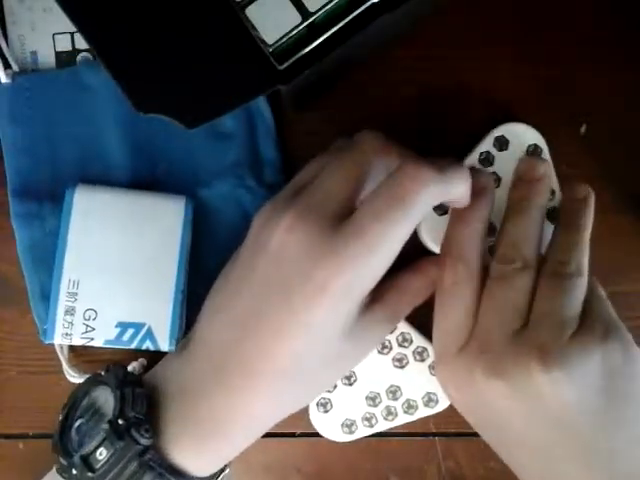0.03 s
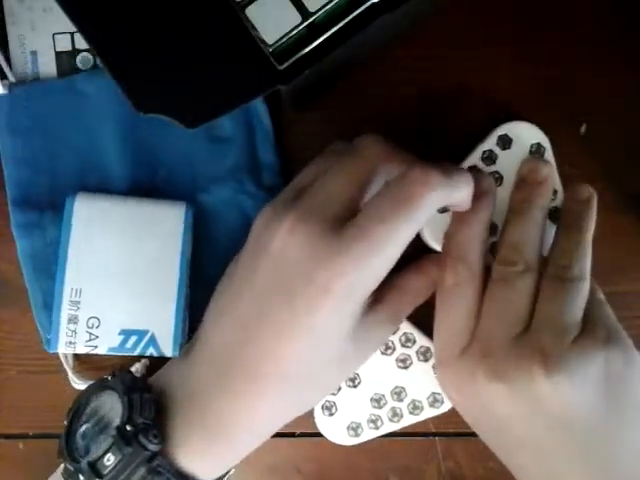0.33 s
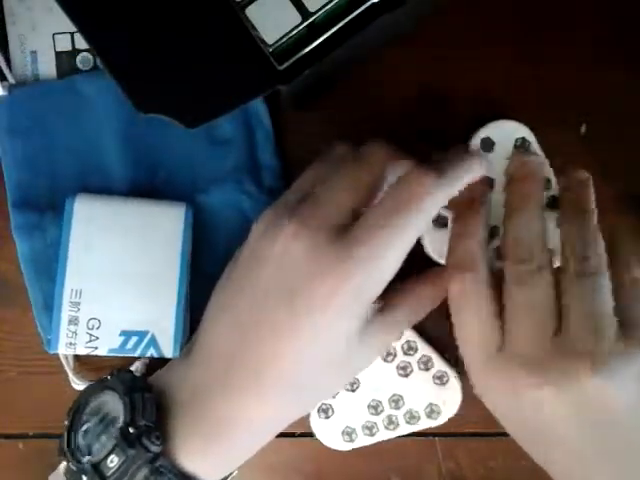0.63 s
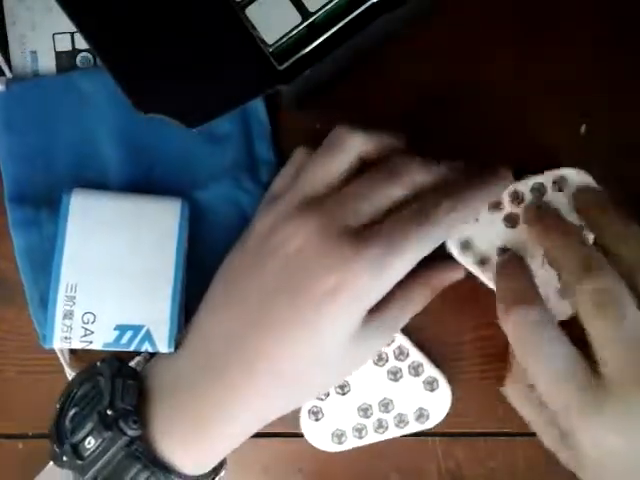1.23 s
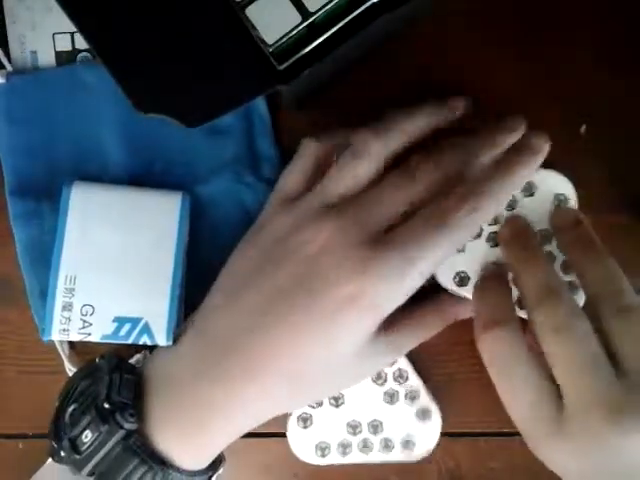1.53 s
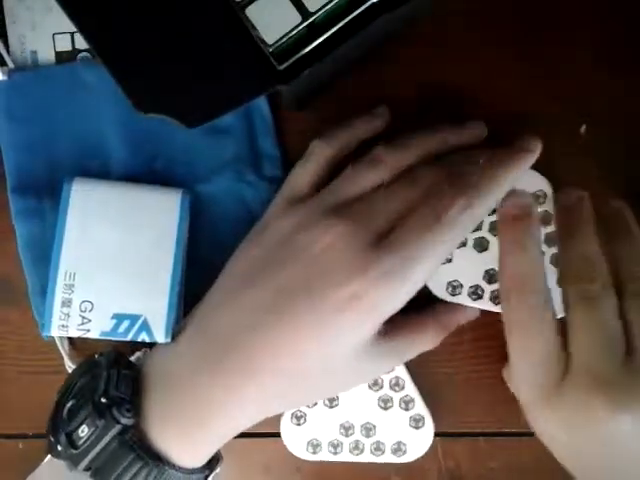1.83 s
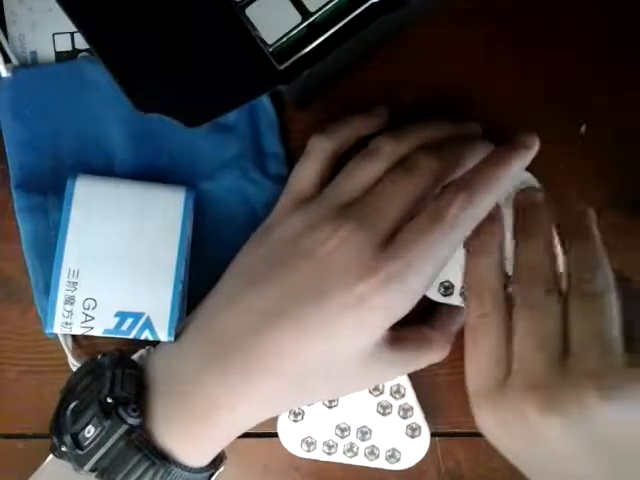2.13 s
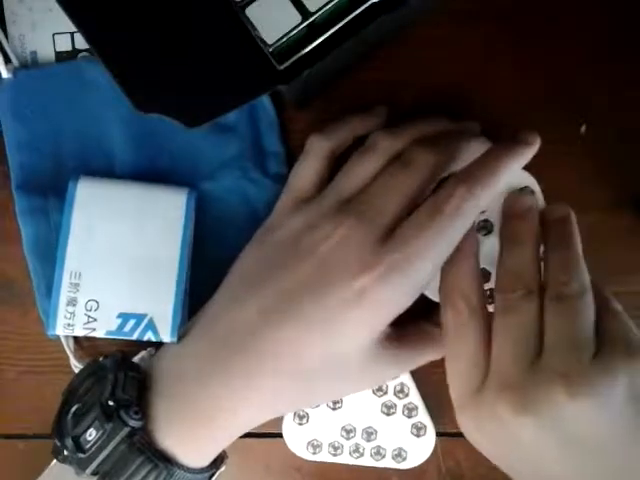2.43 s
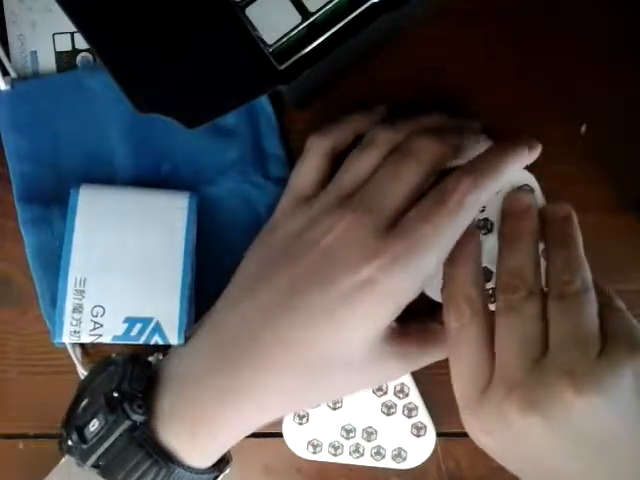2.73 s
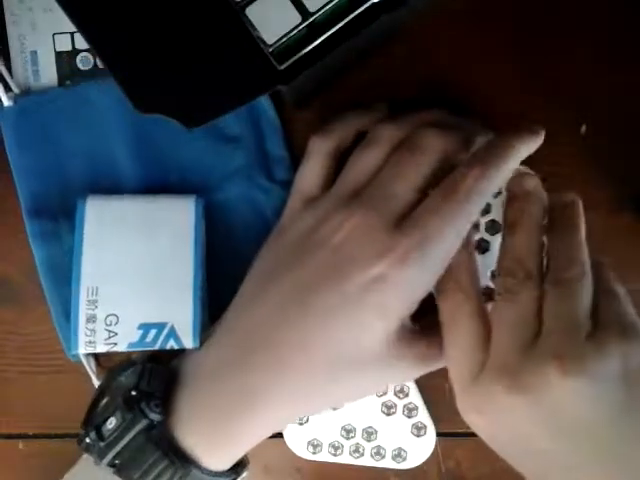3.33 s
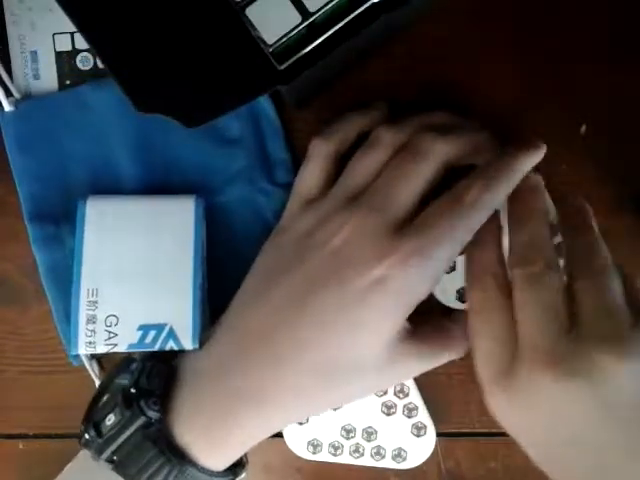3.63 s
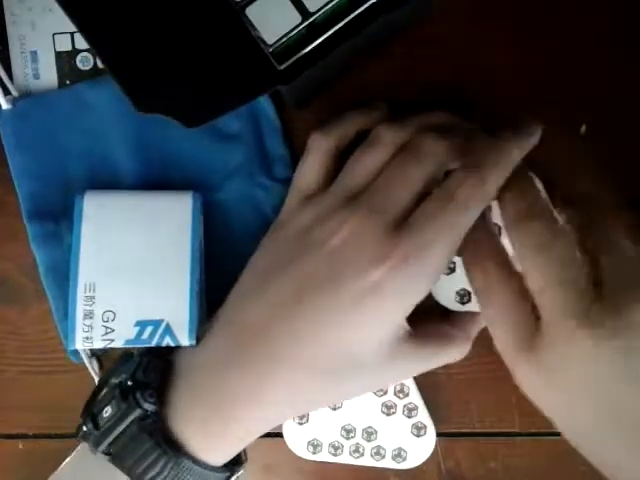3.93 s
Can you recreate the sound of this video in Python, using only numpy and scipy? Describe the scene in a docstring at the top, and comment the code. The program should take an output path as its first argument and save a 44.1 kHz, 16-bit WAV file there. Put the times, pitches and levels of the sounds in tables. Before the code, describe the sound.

Small stiff cards are handled on a wooden table in a small room. Light ticks lead to a flat slap at about 0.8 seconds, then papery sliding and scraping with tiny squeaks until 1.7. Scattered taps, soft knocks and a brief slide follow. At 3.5 seconds one card snaps down hard with a thump, the loudest moment, then a few quieter ticks. A faint low electrical hum runs underneath.

```python
"""A small room: hands turn and slide small stiff cards on a wooden table.
Edges tick and scrape as bursts of micro-impacts that drive the papery card and the ringing tabletop.
Sliding cards hiss, rasp and squeak, flat slaps knock hollow, and hands thump softly on the wood.
Near the end one card snaps down hard; a limiter catches it and slow gain control ducks what follows.
A low electrical hum lies under it all."""
import sys
import numpy as np
from scipy import signal
from scipy.fft import rfft, irfft
from scipy.io import wavfile
from scipy.ndimage import uniform_filter1d

SR = 44100
rng = np.random.default_rng(int(sys.argv[2]) if len(sys.argv) > 2 else 0)


def output_pcm(signal):
    """Save a mono or channel-first signal as 16-bit PCM at the path in sys.argv[1].

    Samples are clipped to [-1, 1] before scaling.
    """
    pcm = np.clip(np.atleast_2d(signal).T, -1, 1) * 32767
    wavfile.write(sys.argv[1], SR, np.round(pcm).astype(np.int16))


N = 176400

# card response: (frequency [Hz], relative level [dB])
CARD_SPECTRUM = [(900, -26), (1500, -16), (2240, -13.5), (2600, -5.5), (3380, 0.5), (3950, -1.5),
                 (4600, -1), (5340, 1.5), (6130, -2), (7200, -16.5), (8100, -19), (9200, -26.5),
                 (12000, -36), (15500, -48)]
# tabletop response: (frequency [Hz], relative level [dB])
WOOD_SPECTRUM = [(120, -7), (290, -17), (410, 1), (465, -3), (522, 8.5), (595, -13.5), (662, 5.5),
                 (740, -3.5), (840, 1.5), (1000, -6.5), (1330, -2), (1620, -13), (1900, -7), (2600, -20),
                 (5000, -43)]
ATTACK_S = 0.00064


def amp(db):
    """Decibels to gain."""
    return 10 ** (np.asarray(db) / 20)


def unit(x):
    """Scale to unit rms."""
    return x / np.sqrt(np.mean(x ** 2) + 1e-20)


def log_interp(points, hz):
    """Table lookup on a log-frequency axis."""
    f, value = np.transpose(points)
    return np.interp(np.log(hz + 1), np.log(f + 1), value)


def add(mix, start_s, sound):
    """Mix a sound in, in place."""
    part = mix[round(start_s * SR):][:len(sound)]
    part += sound[:len(part)]


def body(spectrum, tilt_db_per_oct=0, pivot_hz=4500):
    """Minimum-phase impulse response of unit energy, tilted around the pivot."""
    hz = np.fft.rfftfreq(4096, 1 / SR)
    octaves = np.clip(np.log2((hz + 1) / pivot_hz), -.7, .6)
    db = log_interp(spectrum, hz) + tilt_db_per_oct * octaves
    mirrored_db = np.r_[db, db[-2:0:-1]]
    phase = -signal.hilbert(np.log(amp(mirrored_db))).imag[:len(hz)]
    response = irfft(amp(db) * np.exp(1j * phase))
    return response / np.linalg.norm(response)


def background(noise_db=-49.5, hum_hz=122.3, hum_db=-52.5):
    """Low rumble, faint hiss and steady electrical hum."""
    # room noise: (frequency [Hz], relative level [dB])
    noise_spectrum = [(20, -20), (40, -13.5), (56, 1), (72, -5.5), (95, 3.5), (125, 1.5), (165, -5),
                      (210, -12.5), (280, -20), (500, -22), (1000, -26.5), (2000, -30.5), (5000, -28.5),
                      (8000, -33.5), (15500, -35.5)]
    gain = amp(log_interp(noise_spectrum, np.fft.rfftfreq(N, 1 / SR)))
    noise = irfft(rfft(rng.standard_normal(N)) * gain, N)
    hum = np.sin(2 * np.pi * hum_hz * np.arange(N) / SR)
    return amp(noise_db) * unit(noise) + amp(hum_db) * unit(hum)


def room(x, wet_db=-6.5, early_db=6.5, early_s=0.021, build_s=0.0068, size=22050):
    """Dense reflections, strong early from nearby surfaces; each band decays at its own rate."""
    # reverberation: (frequency [Hz], T60 [s])
    decay_times = [(150, 0.61), (600, 0.26), (3500, 0.33), (6000, 0.25), (10000, 0.28), (16000, 0.26)]
    reflections = rng.standard_normal(size) * (rng.random(size) < .15)
    hz, t, bands = signal.stft(reflections, SR, nperseg=256)
    level_db = early_db * np.exp(-(t / early_s) ** 2) - 60 * t / log_interp(decay_times, hz)[:, None]
    tail = signal.istft(bands * amp(level_db), SR, nperseg=256)[1]
    tail *= np.clip(np.arange(len(tail)) / SR / build_s, 0, 1) ** 2
    return amp(wet_db) * signal.fftconvolve(x, tail / np.linalg.norm(tail))[:N]


def thumps(rise_s=0.0064, decay_s=0.03, size=12000):
    """Fingers and the heel of the hand press down; the table booms briefly."""
    # hand pushes: (time [s], level [dB])
    pushes = [(0.23, -50), (0.345, -46), (.405, -46.5), (.597, -47.5), (1.69, -47.5), (2.324, -41),
              (2.55, -39.5), (3.346, -34), (3.515, -22.5)]
    # table boom: (frequency [Hz], relative level [dB])
    boom_spectrum = [(30, -26), (60, -15), (90, -2), (125, 6.5), (185, -5), (260, -17), (1000, -40)]
    out, t, table = np.zeros(N), np.arange(size) / SR, body(boom_spectrum)
    envelope = (1 - np.exp(-t / rise_s)) * np.exp(-t / decay_s)
    for start_s, db in pushes:
        boom = signal.fftconvolve(rng.standard_normal(size) * envelope, table)
        add(out, start_s, amp(db) * boom * np.sqrt(decay_s * SR / np.sum(boom ** 2)))
    return out


def squeaks(length_s=0.03, filter_width_hz=770):
    """Stick-slip: short swells of friction in one narrow resonance."""
    # card slips: (time [s], pitch [Hz], level [dB])
    slips = [(0.926, 4800, -33), (0.476, 2980, -52), (1.698, 3180, -34), (2.334, 2720, -45),
             (2.468, 2680, -38.5), (2.696, 3220, -47), (3.345, 3250, -30)]
    out, swell = np.zeros(N), np.hanning(int(length_s * SR))
    for start_s, hz, db in slips:
        resonance = signal.iirpeak(hz, hz / filter_width_hz, SR)
        friction = signal.filtfilt(*resonance, rng.standard_normal(SR))[SR // 2:][:len(swell)]
        add(out, start_s, amp(db) * swell * unit(friction))
    return out


def grit(unevenness, size):
    """Micro-impacts of uneven strength."""
    impacts, strength = rng.standard_normal((2, size))
    return unit(impacts * np.exp(unevenness * unit(uniform_filter1d(strength, size=12))))


def shifting_grip(x, depth_db=2):
    """Resonances come and go at random as the card turns and the grip changes."""
    bands = signal.stft(x, nperseg=512)[2]
    patches = uniform_filter1d(rng.standard_normal(bands.shape), size=5, axis=0)
    patches = uniform_filter1d(patches, size=12, axis=1)
    return unit(signal.istft(bands * amp(depth_db * unit(patches)), nperseg=512)[1][:N])


def slides(flutter_db=2, catches_per_s=60, unevenness=0.13):
    """Friction drives card and tabletop; the face rasps, the edge catches on the grain and rings."""
    # one breakpoint list per stroke: (time [s], hiss level [dB], tabletop level [dB])
    strokes = [
        [(.78, -31.5, -39), (.86, -33.5, -53.5), (.96, -43.5, -51), (1.06, -40.5, -52.5), (1.095, -45, -44),
         (1.19, -45, -52), (1.23, -37, -50.5), (1.29, -38.5, -48), (1.34, -31.5, -47.5), (1.38, -38.5, -72),
         (1.415, -28, -41.5), (1.48, -48, -54.5), (1.54, -41, -51.5), (1.63, -31.5, -45.5),
         (1.715, -46.5, -53.5), (1.78, -73, -60.5)],
        [(2.3, -55, -50.5), (2.38, -57, -59), (2.465, -34.5, -44), (2.505, -49, -47), (2.61, -50, -58.5),
         (2.72, -55, -59)],
    ]
    edge_hz, edge_width_hz, face_hz, face_width_hz = 7580, 430, 1790, 1250
    hiss_trim_db, catch_re_hiss_db, rasp_re_hiss_db = -3, -10, -15.5
    edge = signal.iirpeak(edge_hz, edge_hz / edge_width_hz, SR)
    face = signal.iirpeak(face_hz, face_hz / face_width_hz, SR)
    out, t = np.zeros(N), np.arange(N) / SR
    for stroke in strokes:
        times_s, hiss_db, wood_db = np.transpose(stroke)
        moving = (t > times_s[0]) * (t < times_s[-1])
        hiss_gain = amp(np.interp(t, times_s, hiss_db) + hiss_trim_db) * moving
        wood_gain = amp(np.interp(t, times_s, wood_db)) * moving
        flutter = amp(flutter_db * unit(uniform_filter1d(rng.standard_normal(N), size=400)))
        friction = shifting_grip(grit(unevenness, N) * flutter)
        bursts = np.convolve(rng.random(N) < catches_per_s / SR, np.hanning(SR // 200), "same")
        catches = amp(catch_re_hiss_db) * unit(bursts * rng.standard_normal(N))
        rasp = amp(rasp_re_hiss_db) * unit(signal.filtfilt(*face, grit(unevenness, N) * flutter))
        out += rasp * hiss_gain
        out += signal.fftconvolve(friction * hiss_gain, body(CARD_SPECTRUM))[:N]
        out += signal.fftconvolve(catches * hiss_gain, body(CARD_SPECTRUM, tilt_db_per_oct=4.5))[:N]
        out += signal.lfilter(*edge, (friction + catches) * hiss_gain)
        out += signal.fftconvolve(friction * wood_gain, body(WOOD_SPECTRUM))[:N]
    return out


def contact(length_s, response, attack_s=ATTACK_S, size=6000):
    """Burst of micro-impacts through a body; about unit rms over the first 10 ms."""
    t = np.arange(size) / SR
    release = np.exp(-(t / length_s) ** 1.34)  # exponent > 1: brief hold before the decay
    envelope = (1 - np.exp(-t / attack_s)) * release
    burst = signal.fftconvolve(grit(unevenness=0.26, size=size) * envelope, response)
    energy = np.sum(envelope ** 2) / np.mean(envelope[:SR // 100] ** 2)
    return burst * np.sqrt(energy / np.sum(burst ** 2))


def taps(rows, attack_s=ATTACK_S, card_trim_db=0.5, wood_trim_db=-1.5):
    """Each touch excites the dead, papery card and the ringing tabletop."""
    out, wood = np.zeros(N), body(WOOD_SPECTRUM)
    for start_s, card_db, wood_db, tilt_db_per_oct, length_s in rows:
        card = body(CARD_SPECTRUM, tilt_db_per_oct)
        add(out, start_s, amp(card_db + card_trim_db) * contact(length_s, card, attack_s))
        add(out, start_s, amp(wood_db + wood_trim_db) * contact(length_s, wood, attack_s))
    return out


def ticks(length_s=0.0091, fingertip_db_per_oct=-10.5):
    """Card edges tick down crisply; fingertips land dully on the card."""
    # edge landings: (time [s], card level [dB], tabletop level [dB], tilt [dB/oct])
    edges = [(0.234, -40, -49, -5), (0.245, -27, -44.5, 6), (0.346, -43, -47.5, 0.5), (0.404, -46, -61, 5),
             (0.629, -38, -55, -2.5), (0.661, -42, -53, 5), (0.765, -40, -72, 5), (1.208, -31, -42.5, 1),
             (1.39, -29.5, -40, -1), (1.502, -38.5, -71, -5), (1.557, -27.5, -40.5, -0.5),
             (1.743, -40.5, -49, -8.5), (2.15, -33.5, -46.5, -1), (2.377, -32.5, -39.5, 6),
             (2.391, -37, -59, 2), (2.415, -37.5, -43.5, 4), (2.492, -34.5, -51, 0),
             (2.521, -33.5, -43, 2.5), (2.593, -43, -44, -5), (2.644, -29.5, -41, 5.5),
             (2.956, -38, -52, -6), (2.979, -40.5, -49, 0), (3.205, -32.5, -39.5, -1.5),
             (3.221, -34, -40, 3), (3.244, -32, -44.5, -0.5), (3.348, -26.5, -33.5, 8),
             (3.435, -32, -48, -0.5), (3.75, -37, -52, 7.5), (3.869, -35, -46, 4)]
    # fingertip landings: (time [s], level [dB])
    fingertips = [(0.447, -53.5), (2.548, -44.5), (2.699, -49), (2.738, -51), (2.869, -51)]
    dull = [(start_s, db, db, fingertip_db_per_oct) for start_s, db in fingertips]
    return taps([(*row, length_s) for row in [*edges, *dull]])


def scrapes():
    """Edges catch and drag briefly: contacts with a slower attack."""
    # edge drags: (time [s], card level [dB], tabletop level [dB], tilt [dB/oct], length [s])
    drags = [(0.47, -52, -58.5, -6, 0.031), (0.599, -41, -54, -0.5, 0.029),
             (0.927, -35.5, -51.5, 0.5, 0.021), (0.95, -35, -52, 7.5, 0.032), (1.115, -34, -77, 1, 0.015),
             (1.347, -32, -38, 3, 0.016), (1.578, -36, -45.5, -14, 0.013),
             (1.693, -34.5, -67, -3.5, 0.0089), (1.941, -46, -51, -1, 0.0092),
             (2.019, -41, -42.5, -4, 0.012), (2.16, -27.5, -50, -1, 0.011), (2.336, -40.5, -62, -4, 0.011),
             (2.461, -30.5, -41.5, -2, 0.012), (2.798, -47, -46.5, -7.5, 0.02),
             (2.902, -40, -47, 1, 0.0071), (3.354, -24.5, -36, -1.5, 0.006),
             (3.902, -41, -46.5, -3, 0.0061)]
    return taps(drags, attack_s=0.0017)


def knocks(rise_s=0.0026, t60_s=0.04, size=6000):
    """A card slapped flat: a contact plus a hollow ring, pitched by how the card lies."""
    # flat slaps: (time [s], card level [dB], tabletop level [dB], tilt [dB/oct], length [s],
    # ring pitch [Hz], ring level [dB])
    slaps = [(0.784, -32.5, -34, 5, 0.015, 770, -34.5), (0.828, -23, -29.5, 5.5, 0.016, 833, -37),
             (1.919, -43, -44, -4, 0.027, 838, -38), (2.445, -30, -34.5, -1.5, 0.012, 876, -29.5),
             (2.904, -39.5, -42, 1.5, 0.01, 654, -40.5), (3.081, -33, -39, 2, 0.01, 810, -38),
             (3.184, -34, -42, 2.5, 0.01, 727, -35)]
    out, t = taps([row[:5] for row in slaps]), np.arange(size) / SR
    for start_s, *_, hz, db in slaps:
        envelope = amp(db - 60 * t / t60_s) * (1 - np.exp(-t / rise_s))
        add(out, start_s, 2 * envelope * np.sin(2 * np.pi * hz * t))
    return out


def snap(boost_db=7.5, crack_trim_db=-11.5, crack_s=0.011):
    """One hard blow: card and tabletop, plus a hollow clap and a treble crack."""
    # rapid contacts: (time [s], card level [dB], tabletop level [dB], tilt [dB/oct], length [s])
    hits = [(3.5126, -12, -25.5, 6.5, 0.01), (3.515, -9, -21, 11, 0.0084),
            (3.531, -16.5, -32.5, 4.5, 0.039)]
    # clap and crack: (frequency [Hz], relative level [dB])
    crack_spectrum = [(1000, -15), (1370, 4.5), (1620, -7), (1950, 0.5), (2900, -3.5), (7500, -5),
                      (10500, -11), (15500, -21)]
    out = taps(hits)
    add(out, hits[0][0], amp(crack_trim_db) * contact(crack_s, body(crack_spectrum)))
    return amp(boost_db) * out


def duck(x, threshold_db, ratio, recovery_db_per_s, lookahead_s):
    """Gain falls just ahead of a loud sound and recovers at a steady rate."""
    t = np.arange(N) / SR
    power_db = 10 * np.log10(abs(uniform_filter1d(x ** 2, size=440)) + 1e-12)
    ramp_db = recovery_db_per_s * t
    held_db = np.maximum.accumulate(power_db + ramp_db) - ramp_db
    over_db = uniform_filter1d(np.maximum(held_db - threshold_db, 0), size=400)
    return x / amp(np.interp(t + lookahead_s, t, over_db) * (1 - 1 / ratio))


def scene():
    """Cards with room reflections, over thumps and background; mono."""
    cards = ticks() + scrapes() + knocks() + snap() + slides() + squeaks()
    return (cards + room(cards) + thumps() + background())[None]


def record(dry):
    """Fast limiter, slow gain control, clipping at full scale, low-pass."""
    limited = duck(dry[0], threshold_db=-21, ratio=1.49, recovery_db_per_s=119, lookahead_s=0.0026)
    levelled = duck(limited, threshold_db=-20, ratio=1.65, recovery_db_per_s=1, lookahead_s=0.009)
    cutoff_hz = 15750
    lowpass = signal.firwin(511, cutoff_hz, window=("kaiser", 9), fs=SR)
    return signal.oaconvolve(np.clip(levelled, -1, 1), lowpass, "same")[None]


dry = scene()
out = record(dry)
output_pcm(out)
```